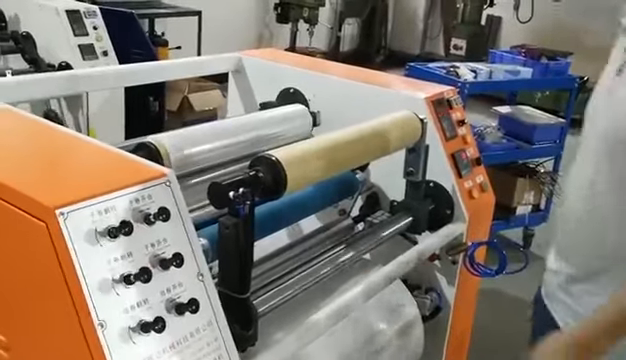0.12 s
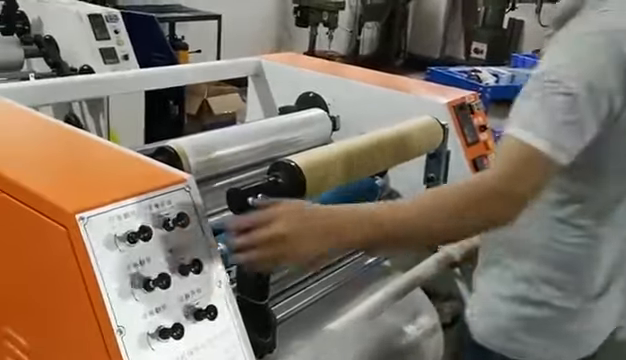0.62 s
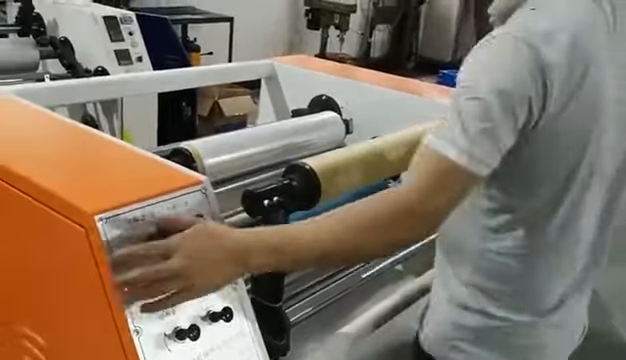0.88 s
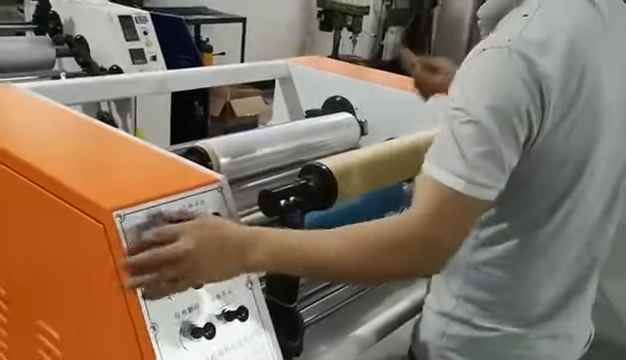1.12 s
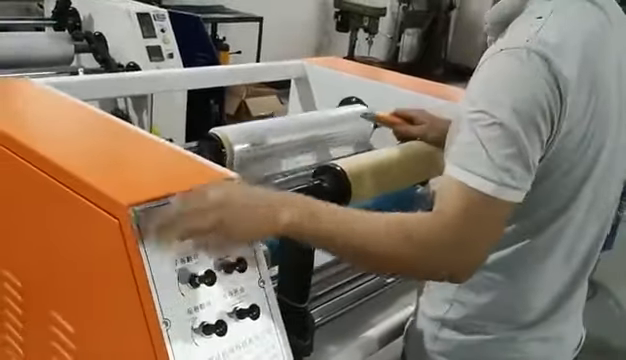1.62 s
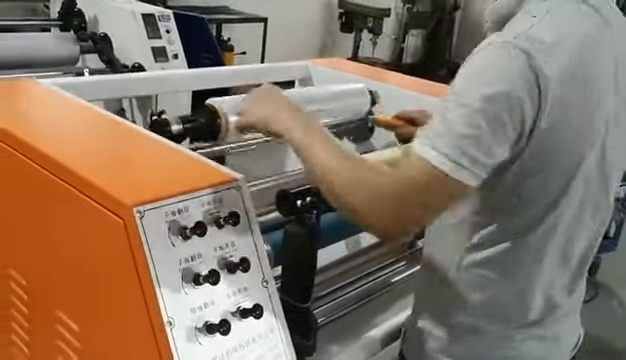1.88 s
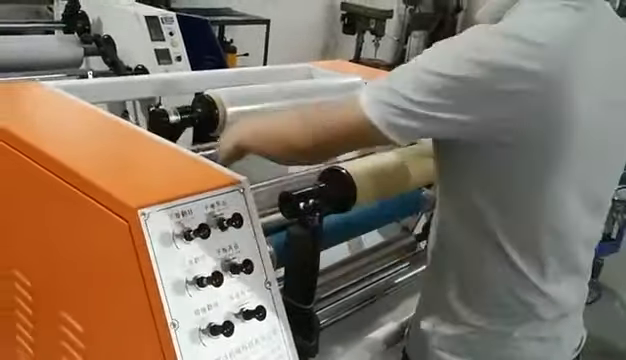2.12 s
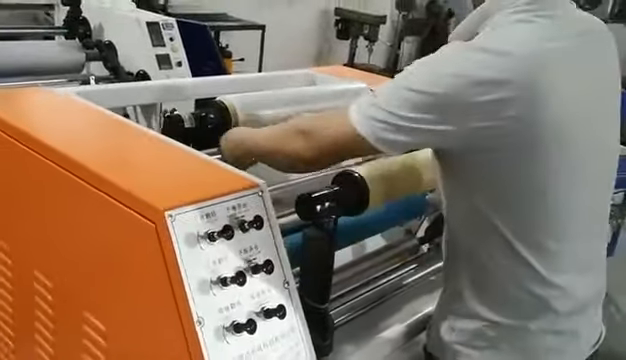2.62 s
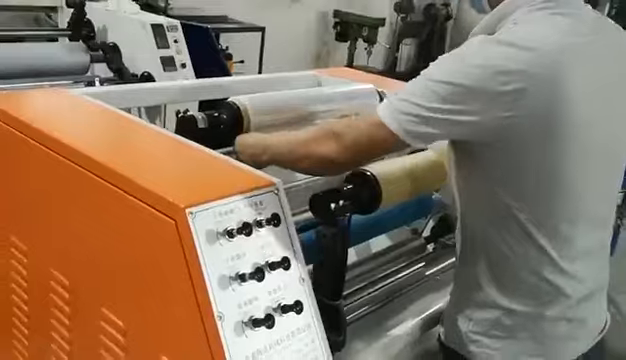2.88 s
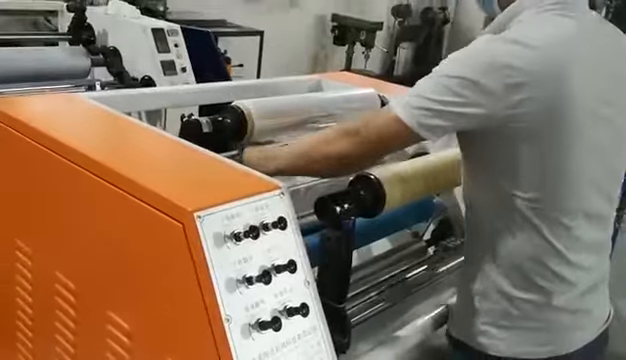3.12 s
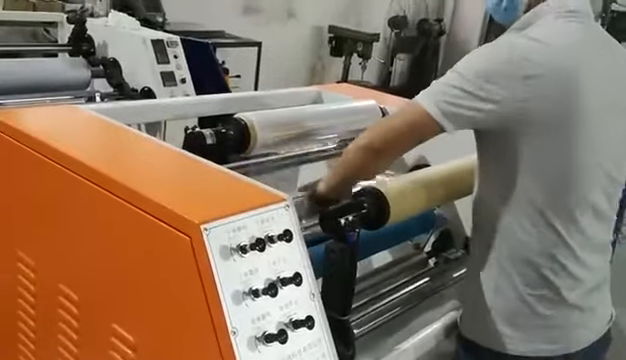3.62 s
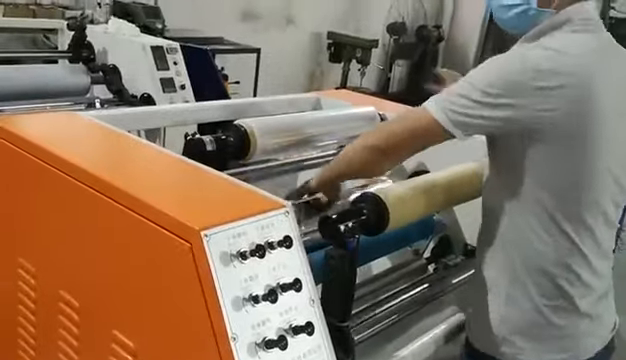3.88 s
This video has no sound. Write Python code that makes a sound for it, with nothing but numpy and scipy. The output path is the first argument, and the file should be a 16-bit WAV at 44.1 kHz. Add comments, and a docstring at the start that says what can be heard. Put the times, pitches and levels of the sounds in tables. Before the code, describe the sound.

Metal clanks, pneumatic puffs and hand knocks on a film winding machine over steady workshop hum

```python
"""An echoing workshop with a film winding machine; draughts buffet the microphone (shaped noise).
First the hum settles; a toggle rings briefly amid air puffs, a hiss starts and the arm rattles.
A blast hits the microphone; a cylinder scrapes (clicks through resonances), the arm slams on steel.
More puffs and hisses join the slams; a hand then knocks a ringing chuck over crackling film.
After the film has gone quiet, the arm rattles on the frame once more."""
import sys
import numpy as np
from scipy import signal
from scipy.fft import rfft, irfft, next_fast_len
from scipy.io import wavfile
from scipy.ndimage import uniform_filter1d, map_coordinates

SR = 44100
rng = np.random.default_rng(int(sys.argv[2]) if len(sys.argv) > 2 else 0)


def master(y):
    """Save y as 16-bit WAV."""
    cut = np.clip(np.atleast_2d(y).T, -1, 1)
    pcm = np.round(cut * 32767)  # scale
    wavfile.write(sys.argv[1], SR, pcm.astype(np.int16))


def elevation(decibels):
    """Turn decibel levels (scalar or array-like) into linear amplitude ratios."""
    levels = np.asarray(decibels, float)
    return 10 ** (levels / 20)


N = 176400  # samples: 4 s

# Echo of the workshop: (frequency [Hz], decay by 60 dB [s])
SHOP_DECAY = [(100, 1), (500, 0.58), (2000, 1), (8000, 0.43)]
ROOM_DB = -3

# Spectrum of the distant machines: (frequency [Hz], relative density [dB per Hz])
HUM_SPECTRUM = [(90, -22.5), (130, -15.5), (200, -1.5), (240, -0.5), (300, -4), (392, -10), (500, -14),
                (640, -10.5), (1000, -11.5), (1500, -10), (2000, -7.5), (2500, -9.5), (3100, -15),
                (4000, -20.5), (5000, -23.5), (7600, -29.5), (9000, -45.5)]
HUM_DB, HUM_START_DB, HUM_SETTLES_S = -40, -2.5, 0.83  # the start is relative to HUM_DB

# Strength of the draught at the microphone: (time [s], level [dB])
DRAUGHT_LEVEL = [(0, -34.5), (.12, -24.5), (.3, -24), (.37, -28.5), (.52, -39), (.62, -30), (.75, -36),
                 (.86, -31.5), (1.0, -34.5), (1.1, -39), (1.17, -33), (1.3, -39.5), (1.7, -37.5),
                 (1.85, -37.5), (1.95, -48), (2.3, -37), (2.97, -37), (3.1, -36), (3.3, -38), (4, -36)]
# Spectrum of the draught: (frequency [Hz], relative density [dB per Hz])
DRAUGHT_SPECTRUM = [(8.8, -32), (15, -4.5), (38, 1.5), (123, -6), (196, -16.5), (244, -19.5), (272, -32),
                    (400, -37), (520, -65.5), (880, -120)]
BLAST_S, BLAST_DB, BLAST_WIDTH_S = 1.4, -20.5, 0.0049

# Short puffs of compressed air: (start [s], envelope peak [dB], length [s])
AIR_PUFFS = [(1.190, -34.5, .005), (1.2045, -28, .008), (2.0585, -22, .006), (2.076, -28.5, .011),
             (2.097, -29.5, .012), (2.120, -27.5, .009), (2.140, -25, .005), (2.159, -28.5, .012),
             (2.181, -33, .011)]
# Spectrum of escaping air: (frequency [Hz], relative density [dB per Hz])
AIR_SPECTRUM = [(700, -33), (1300, -17), (1700, -12), (3000, -11), (4100, -13), (5000, -5), (6300, -3),
                (7600, -5), (9000, -11)]
# Air bleeding out: (start [s], level [dB], decay by 60 dB [s], valve shuts [s])
AIR_BLEEDS = [(1.208, -36.5, 1.4, 1.4), (2.075, -35.5, 2, 2.22), (2.27, -44, 3, 2.33)]
BLEED_RISE_S, BLEED_SHUT_T60_S = .008, .7
# Modes of the toggle: (frequency [Hz], relative level [dB], decay by 60 dB [s])
TOGGLE_MODES = [(1556, 1.5, 0.016), (2450, -4.5, 0.045), (2937, -4.5, 0.055)]
TOGGLE_S, TOGGLE_DB = 1.2058, -23.5

# Scrape of the cylinder stroke: (time [s], level [dB])
STROKE_LEVEL = [(1.8, -48), (1.808, -42), (1.85, -37), (1.91, -36), (1.96, -35), (2.05, -57)]
# Resonances of the rod: (frequency [Hz], width [Hz], relative level [dB])
ROD_RESONANCES = [(2310, 470, 1), (3700, 720, -2), (5400, 1000, -7), (7300, 640, -12)]
# Tick of the rod: (time [s], level [dB], frequency [Hz], decay by 60 dB [s])
ROD_TICKS = [(1.815, -29.5, 3720, 0.036)]

# Arm meeting the frame: (time [s], level [dB], clank length [s], clank relative to boom [dB])
ARM_SLAMS = [(1.325, -35.5, 0.013, -9), (1.337, -40.5, 0.036, -2), (1.389, -42.5, 0.046, -12.5),
             (1.86, -37, 0.11, -3), (1.908, -29.5, 0.13, -0.5), (2.046, -36, 0.14, -4),
             (2.207, -38, 0.27, 0.5), (3.356, -40.5, 0.097, -1.5)]
# Single hard blows inside the rattles: (time [s], relative impulse [dB])
ARM_BLOWS = [(1.337, -5), (1.913, -4), (1.93, -10.5), (1.95, -4), (1.962, -5), (1.973, -1)]
# Low boom of the frame: (frequency [Hz], width [Hz], relative level [dB])
FRAME_BOOM = [(90.5, 30, -1.5), (164, 70, -4.5), (274, 59, 0), (348, 27, -3), (388, 51, -8.5),
              (559, 78, -11), (750, 230, -14.5)]
# High clank of the frame: (frequency [Hz], width [Hz], relative level [dB])
FRAME_CLANK = [(908, 260, -12), (1290, 940, -12), (1827, 420, -7.5), (2196, 92, -12.5), (2440, 160, -9.5),
               (3800, 690, -20.5), (5550, 4900, -30)]
RATTLE_PER_S, RATTLE_SPREAD_DB, CONTACT_S = 900, 4, .0003
BOOM_LASTS = 1.14  # the boom outlasts the clank by this factor

# Knocks by hand: (time [s], relative level [dB], brightness [dB per octave])
HAND_KNOCKS = [(2.6343, -14, 2.5), (2.6648, -28, -4), (2.6966, -8, 0), (2.7268, -21.5, 0.5),
               (2.7739, -11, -1.5), (2.8047, -34.5, 0.5)]
# Modes of the steel chuck: (frequency [Hz], relative level [dB], decay by 60 dB [s])
CHUCK_MODES = [(834, -11.5, 0.026), (1279, -0.5, 0.018), (1882, 0, 0.026), (2110, -8, 0.041),
               (2350, -3.5, 0.034), (2665, -3, 0.018), (3710, -11, .03), (5700, -12, 0.013),
               (7600, -12, 0.012)]
# Rustling of the film: (time [s], level [dB])
RUSTLE_LEVEL = [(2.55, -58.5), (2.605, -38.5), (2.66, -41.5), (2.73, -36.5), (2.82, -41), (2.93, -47.5),
                (3.08, -54)]
# Spectrum of the film: (frequency [Hz], relative density [dB per Hz])
FILM_SPECTRUM = [(400, -23.5), (700, -13), (1620, -7.5), (2290, 2), (3100, 1), (3890, 2), (4500, -4),
                 (6000, 0.5), (7400, -1.5), (8200, -31.5)]

# Steep treble cutoff of the recorder: (frequency [Hz], gain [dB])
RECORDER_CUTOFF = [(8200, 0), (8500, -38), (9300, -46)]


def unit(x):
    """Scales x to rms 1."""
    return x / np.sqrt(np.mean(x ** 2) + 1e-20)


def along(points, hz):
    """Reads (frequency [Hz], value) points on a log frequency axis."""
    f, v = np.transpose(points)
    return np.interp(np.log(hz + 1), np.log(f + 1), v)


def curve(rows, outside=None):
    """Joins (time [s], value) rows into one value per sample."""
    s, v = np.transpose(rows)
    return np.interp(np.arange(N) / SR, s, v, outside, outside)


def wobble(rate):
    """A smooth random curve with rate knots a second."""
    knots = rng.standard_normal(int(N * rate / SR) + 4)
    return map_coordinates(knots, [np.arange(N) * rate / SR])


def filtered(x, response):
    """Multiplies the spectrum of x by a complex response of frequency."""
    m = next_fast_len(N + SR // 2)
    return irfft(rfft(x, m) * response(np.fft.rfftfreq(m, 1 / SR)), m)[..., :N]


def resonances(table):
    """Causal response of parallel damped resonances with alternating signs."""
    def response(f):
        total = 0
        for k, (center, width, db) in enumerate(table):
            damping = 1j * f * width
            total = total + (-1) ** k * elevation(db) * damping / (center * center - f * f + damping)
        return total
    return response


def rush(spectrum, patchy_db, size=512):
    """Noise of rms 1 with patches of random gain; a larger size makes them narrower and longer."""
    z = signal.stft(rng.standard_normal(N), nperseg=size)[2]
    field = uniform_filter1d(rng.standard_normal(z.shape), size=3, axis=0)
    field = uniform_filter1d(field, size=5, axis=1)
    x = signal.istft(z * elevation(patchy_db * unit(field)), nperseg=size)[1][:N]
    return unit(filtered(x, lambda hz: elevation(along(spectrum, hz))))


def grains(per_s, spread_db):
    """Random clicks of uneven size and either sign, rms 1."""
    chance, side = rng.random((2, N))
    sizes = elevation(spread_db * rng.standard_normal(N))
    return unit((chance < per_s / SR) * np.sign(side - .5) * sizes)


def ring(s, db, modes, crack, tilt_db=0):
    """One blow excites decaying modes, slightly varied in pitch and level, and a short noisy crack."""
    out, t = np.zeros(N + SR), np.arange(SR // 4) / SR
    blow = np.zeros(len(t))
    for hz, level, t60 in modes:
        level = level + tilt_db * np.log2(hz / 2000) + rng.normal(0, 2.5)
        blow += elevation(level - 60 * t / t60) * np.sin(2 * np.pi * hz * rng.normal(1, .015) * t)
    blow += crack * elevation(2 * tilt_db - 60 * t / 0.0053) * rng.standard_normal(len(t))
    attack = 1 - np.exp(-t / 0.00043)
    out[round(s * SR):][:len(t)] = elevation(db) * blow * attack
    return out[:N]


def shop(x):
    """The room's answer is noise in which each frequency dies at its own speed."""
    hz, t, z = signal.stft(rng.standard_normal(SR), SR, nperseg=256)
    decay = elevation(-60 * t / along(SHOP_DECAY, hz)[:, None])
    tail = signal.istft(z * decay, SR, nperseg=256)[1]
    delayed = np.pad(x, (300, 0))  # samples before the echo starts
    return signal.fftconvolve(delayed, tail / np.linalg.norm(tail))[:N]


def machinery():
    """Motors and fans all over the shop blur into one hum of noise that begins a little softer."""
    settling = curve([(0, HUM_START_DB), (HUM_SETTLES_S, 0)])
    level = elevation(HUM_DB + settling + 0.49 * wobble(3.5))
    return level * rush(HUM_SPECTRUM, patchy_db=3.5, size=2048)


def draught():
    """Lumpy moving air buffets the microphone; one valve blast pushes it fast and lets go slower."""
    u = (np.arange(N) / SR - BLAST_S) / BLAST_WIDTH_S
    blast = -elevation(BLAST_DB) * np.exp(-u ** 2 / np.where(u < 0, .3, 3))
    level = elevation(curve(DRAUGHT_LEVEL) + 1.2 * wobble(25))
    return level * rush(DRAUGHT_SPECTRUM, patchy_db=1.2) + blast


def valves():
    """A toggle rings; compressed air puffs, then hisses, sagging faster once the valve shuts."""
    t = np.arange(N) / SR
    puffs, bleed = np.zeros(N), np.zeros(N)
    for s, db, length in AIR_PUFFS:
        puffs += elevation(db) * np.sin(np.pi * np.clip((t - s) / length, 0, 1) ** .7)
    for s, db, t60, shut in AIR_BLEEDS:
        open_s, shut_s = np.clip(t - s, 0, None), np.clip(t - shut, 0, None)
        sag = elevation(db - 60 * open_s / t60 - 60 * shut_s / BLEED_SHUT_T60_S)
        bleed += sag * (1 - np.exp(-open_s / BLEED_RISE_S))
    puffing = puffs * rush(AIR_SPECTRUM, patchy_db=2)
    hissing = bleed * elevation(1.3 * wobble(90)) * rush(AIR_SPECTRUM, patchy_db=2.5)
    return puffing + hissing + ring(TOGGLE_S, TOGGLE_DB, TOGGLE_MODES, crack=1)


def cylinder():
    """The rod scrapes through its seal: clicks and noise excite its resonances, with a tick."""
    friction = grains(2500, spread_db=7.0) + 2.0 * rng.standard_normal(N)
    scrape = unit(filtered(friction, resonances(ROD_RESONANCES)))
    ticks = sum(ring(s, db, [(hz, 0, t60)], crack=.2) for s, db, hz, t60 in ROD_TICKS)
    return elevation(curve(STROKE_LEVEL, -120) + 0.71 * wobble(60)) * scrape + ticks


def slams():
    """The roller arm lands and rattles; its contacts excite the frame's low boom and high clank."""
    t = np.arange(N) / SR
    rattle = grains(RATTLE_PER_S, RATTLE_SPREAD_DB) + .4 * rng.standard_normal(N)

    def shape(s, length):
        rise = np.clip((t - s) / 0.0062, 0, 1)
        return rise * np.exp(-np.clip((t - s) / length, 0, 5) ** 1.9)

    boom = sum(elevation(db) * shape(s, length * BOOM_LASTS) for s, db, length, _ in ARM_SLAMS)
    clank = sum(elevation(db + treble_db) * shape(s, length) for s, db, length, treble_db in ARM_SLAMS)
    blows = np.zeros(N)
    for s, db in ARM_BLOWS:
        blows[round(s * SR)] = -elevation(db)
    blows = uniform_filter1d(blows, round(CONTACT_S * SR))
    low = filtered(rattle * boom + blows, resonances(FRAME_BOOM))
    high = filtered(rattle * clank + blows, resonances(FRAME_CLANK))
    # a steady rattle would give the low part a level of 1
    scale = np.std(filtered(rattle, resonances(FRAME_BOOM)))
    return (low + high) / scale


def hand_work():
    """Knocks ring the modes of the steel chuck; film crackles as filtered clicks and noise."""
    knocks = sum(ring(s, db - 7.5, CHUCK_MODES, crack=1.9, tilt_db=tilt) for s, db, tilt in HAND_KNOCKS)
    crumpling = grains(1800, spread_db=2.5) + 0.6 * rng.standard_normal(N)
    crackle = unit(filtered(crumpling, lambda hz: elevation(along(FILM_SPECTRUM, hz))))
    return knocks + elevation(curve(RUSTLE_LEVEL, -120) + 2.5 * wobble(80)) * crackle


def scene():
    """Near sources are heard directly and through the room, over the hum and the draught."""
    near = [valves(), cylinder(), slams(), hand_work()]
    send_db = [-7.5, 1, -1.5, -1.5]  # into the room, in the same order
    echo = shop(sum(elevation(db) * x for db, x in zip(send_db, near)))
    return (machinery() + draught() + elevation(ROOM_DB) * echo + sum(near))[None]


def roll_off(x):
    """The treble ends steeply here."""
    return signal.sosfilt(signal.butter(12, 9250, fs=SR, output="sos"), x)


def record(dry):
    """The recorder cuts the extreme treble steeply."""
    mix = filtered(dry, lambda hz: elevation(along([(20, 0.011)] + RECORDER_CUTOFF, hz)))
    return roll_off(mix)


dry = scene()
out = record(dry)
master(out)
```